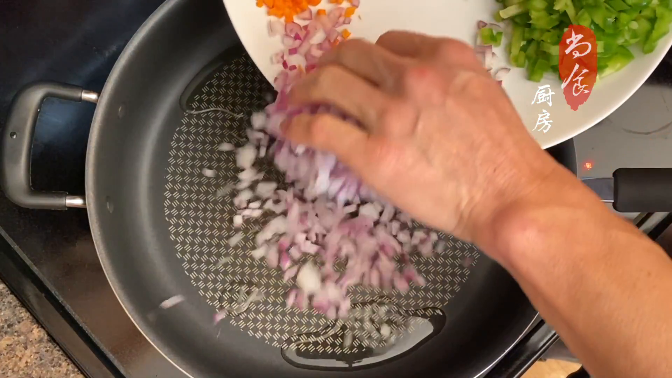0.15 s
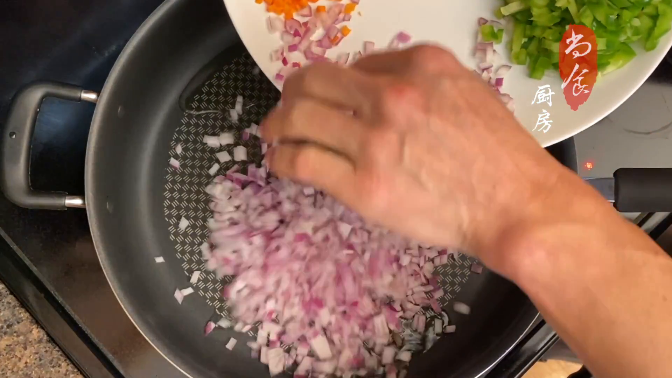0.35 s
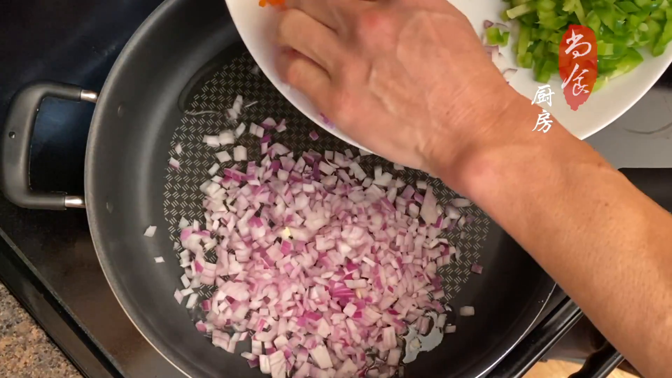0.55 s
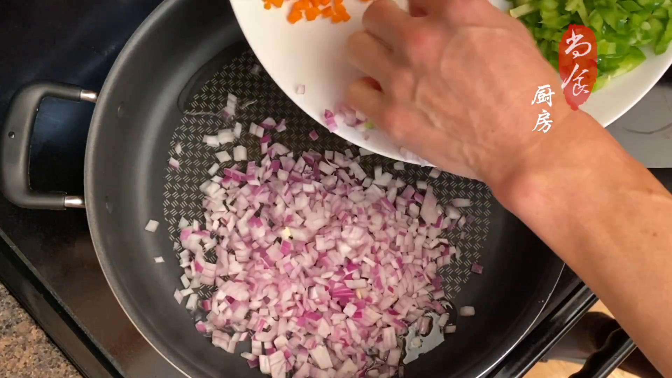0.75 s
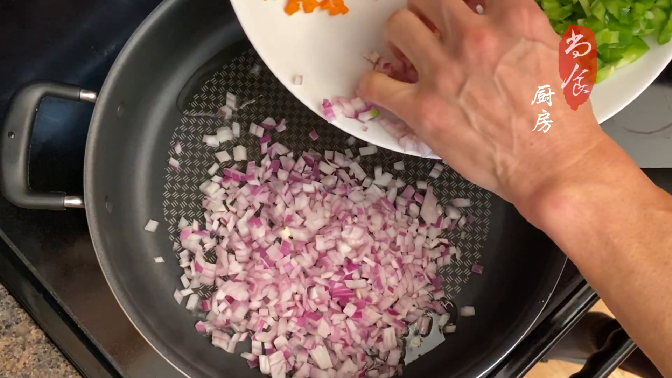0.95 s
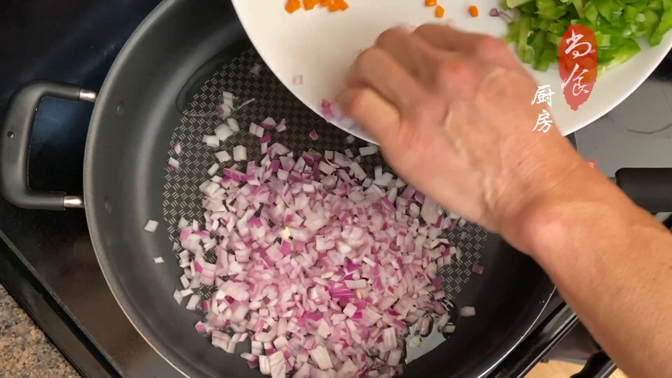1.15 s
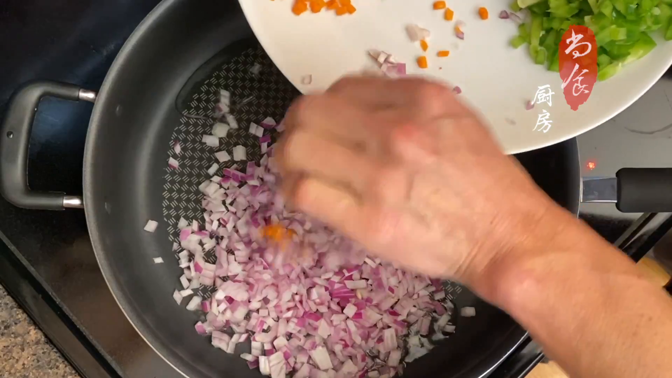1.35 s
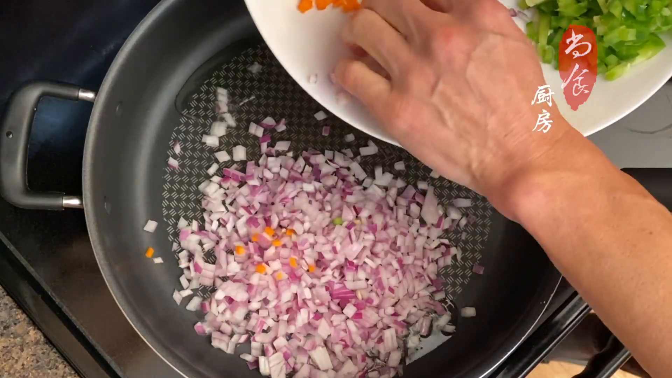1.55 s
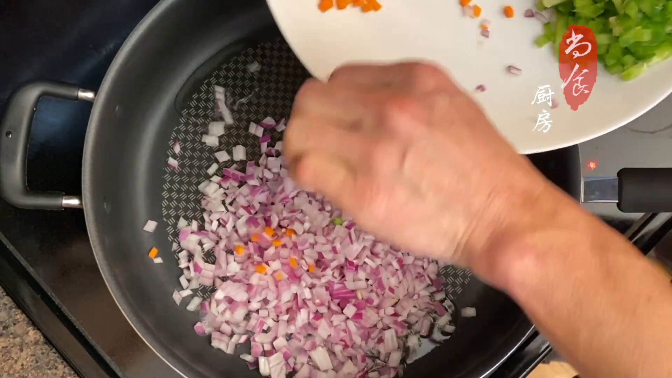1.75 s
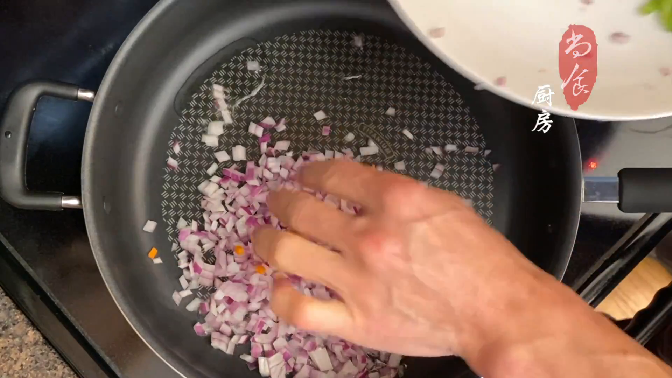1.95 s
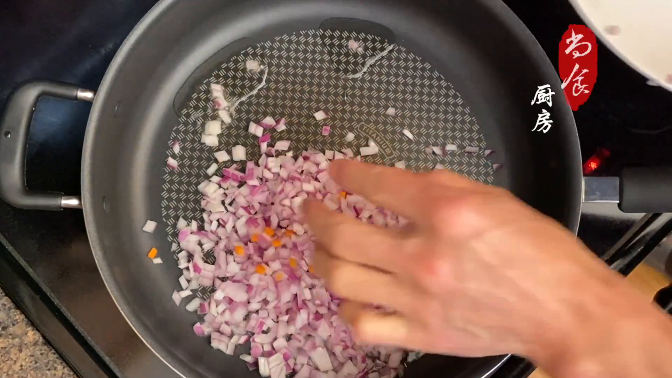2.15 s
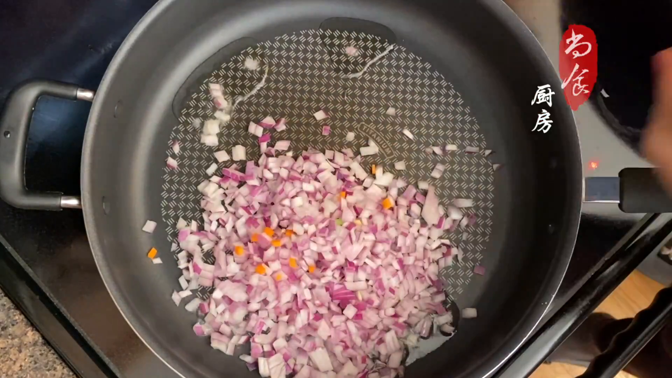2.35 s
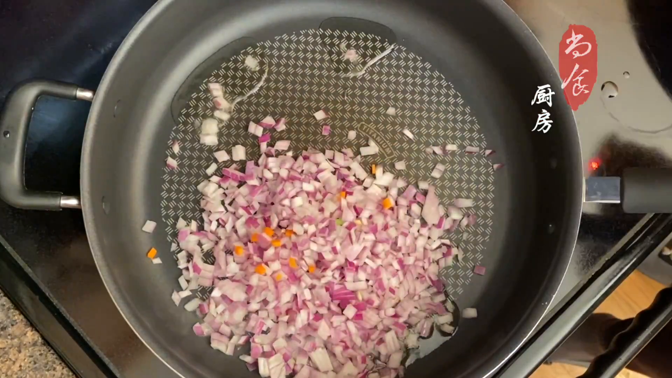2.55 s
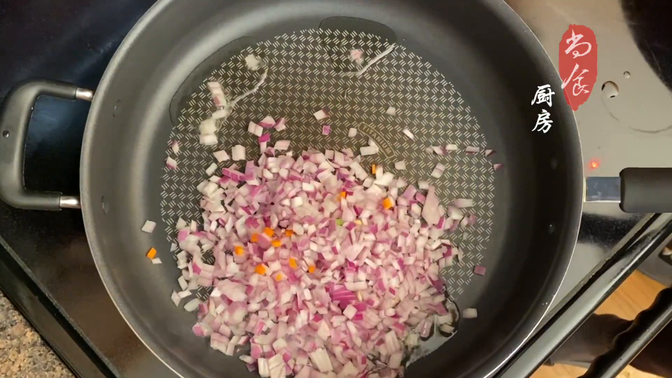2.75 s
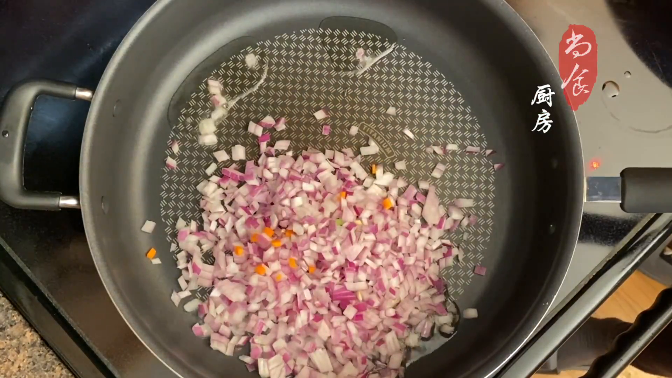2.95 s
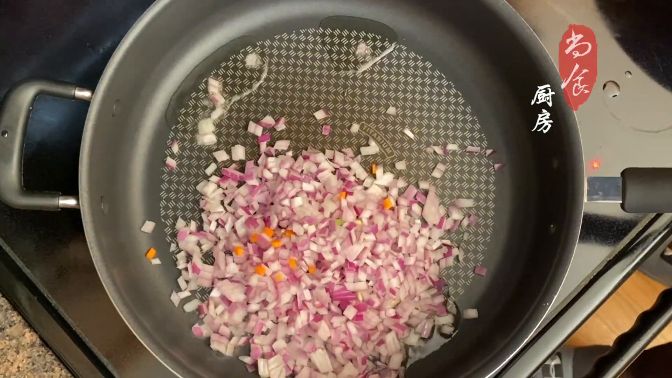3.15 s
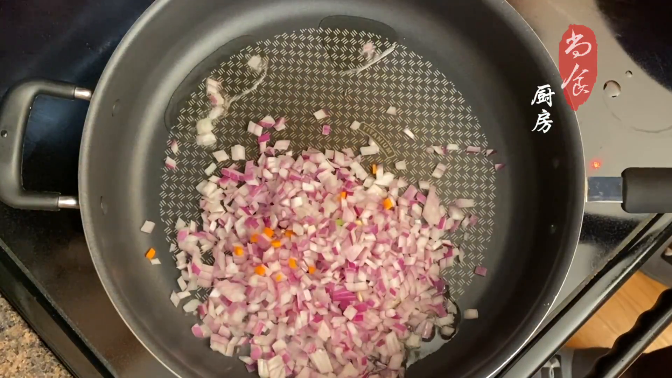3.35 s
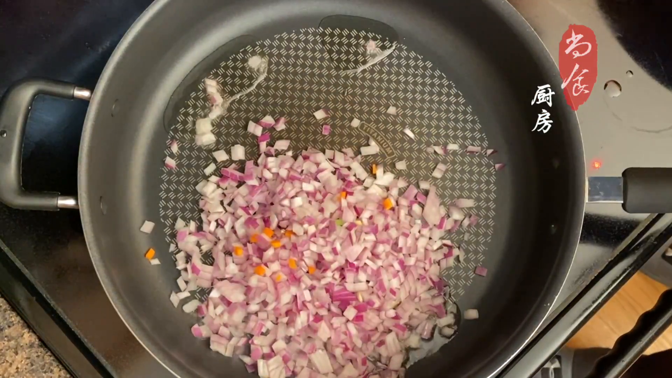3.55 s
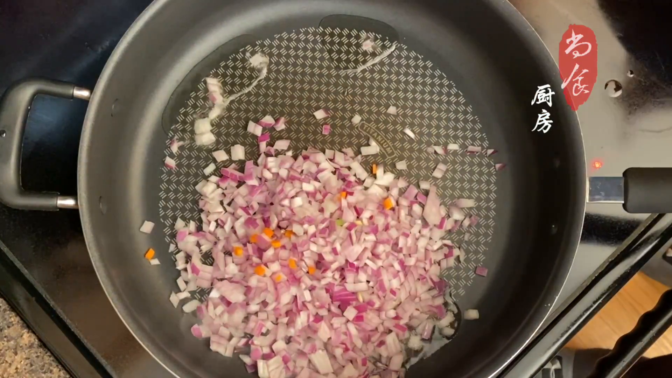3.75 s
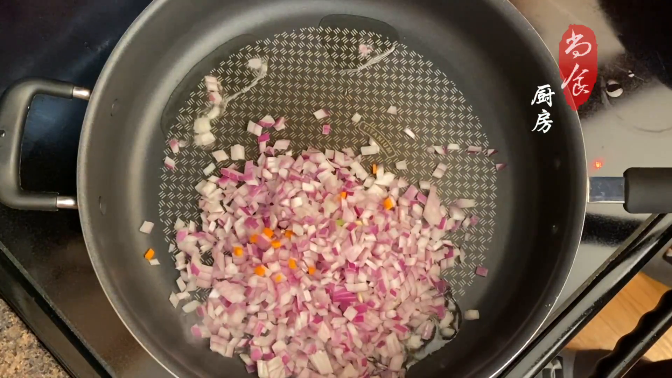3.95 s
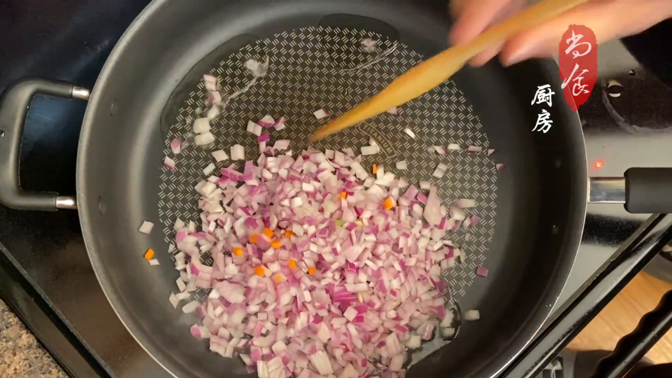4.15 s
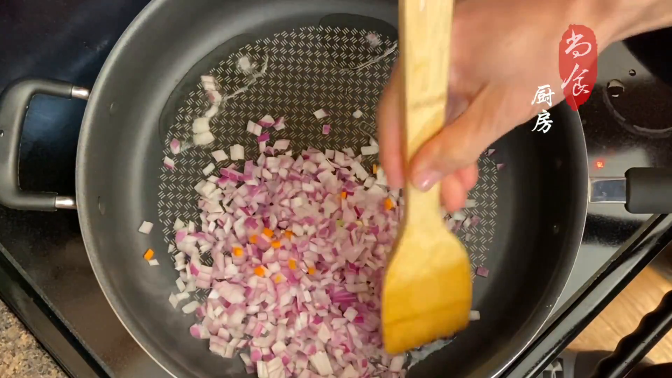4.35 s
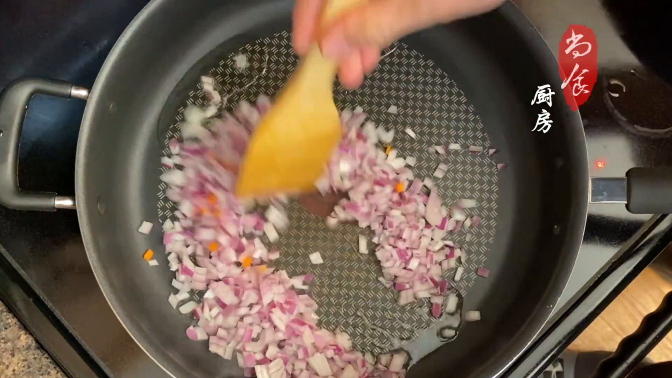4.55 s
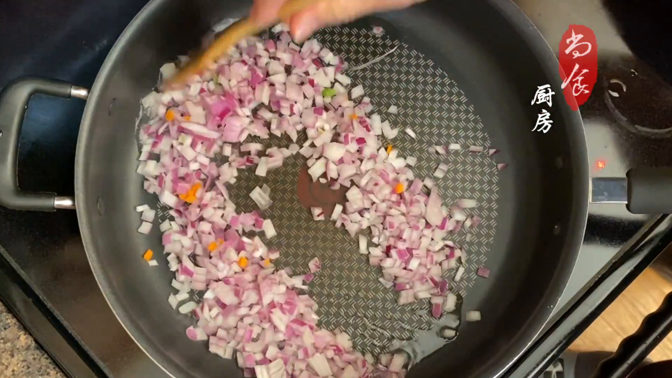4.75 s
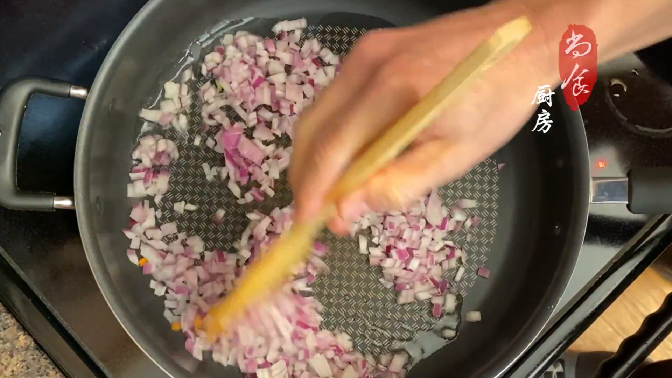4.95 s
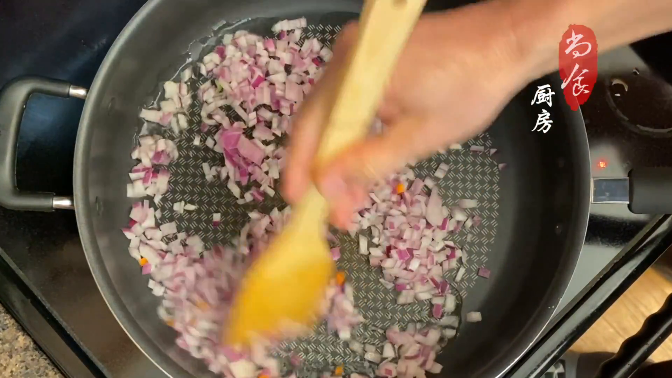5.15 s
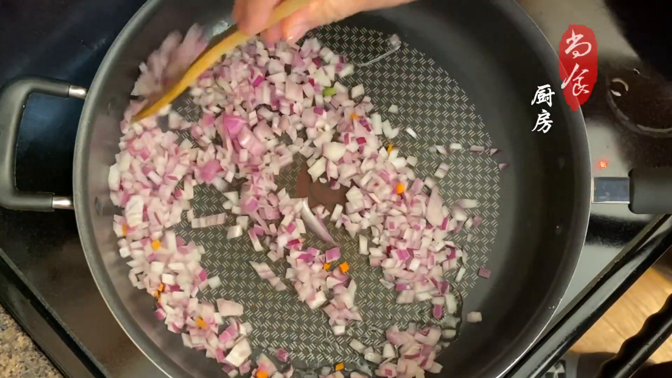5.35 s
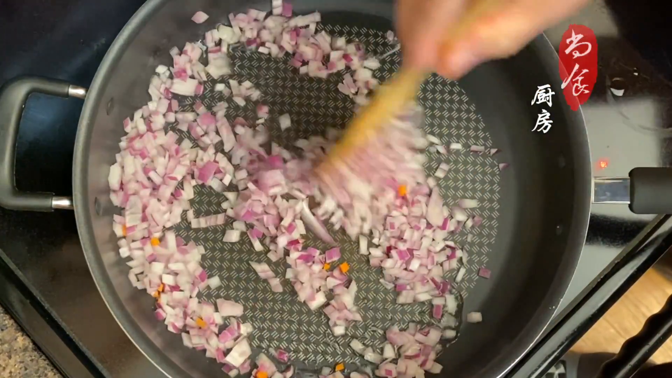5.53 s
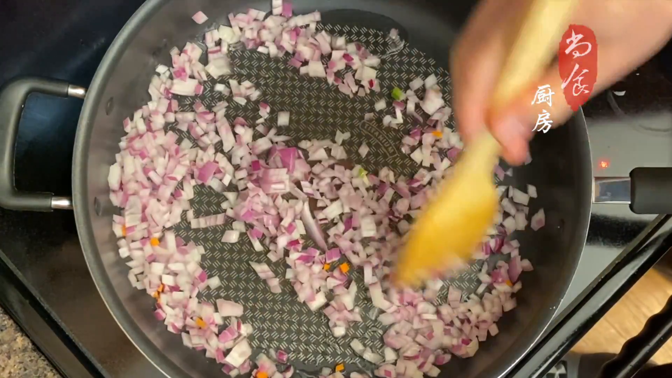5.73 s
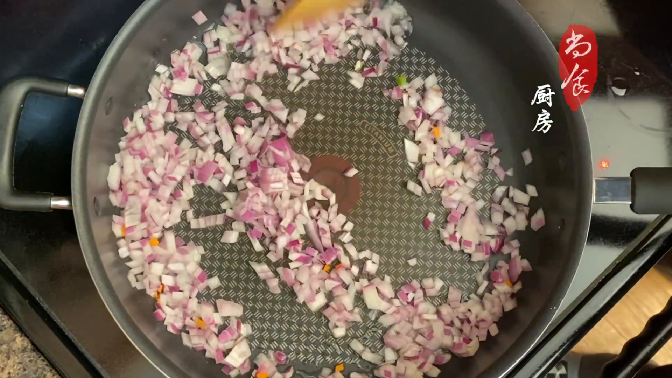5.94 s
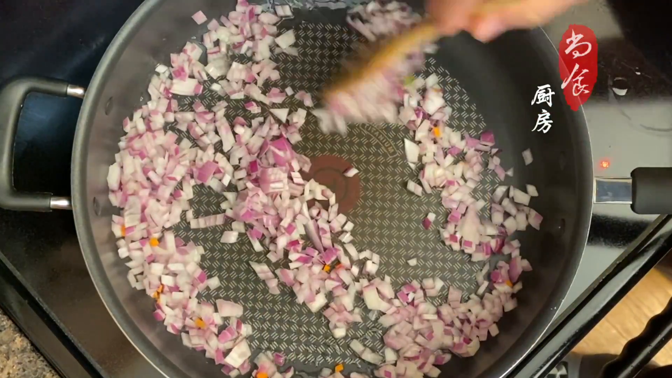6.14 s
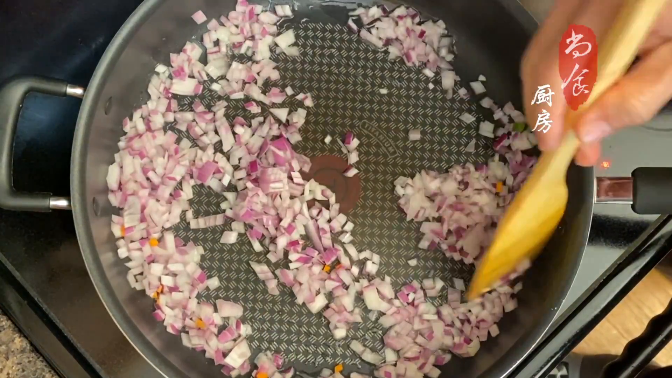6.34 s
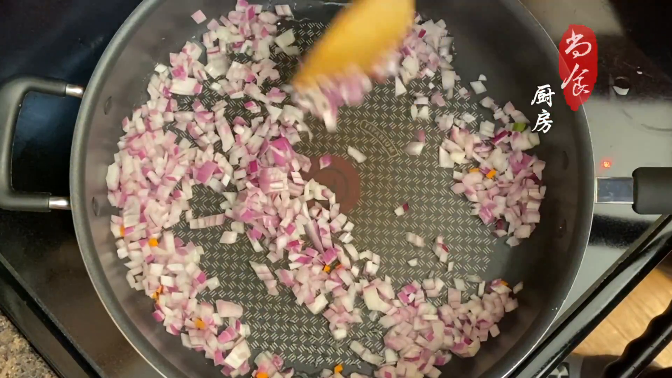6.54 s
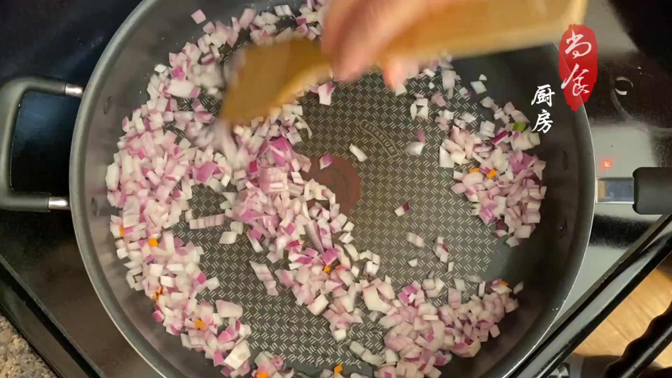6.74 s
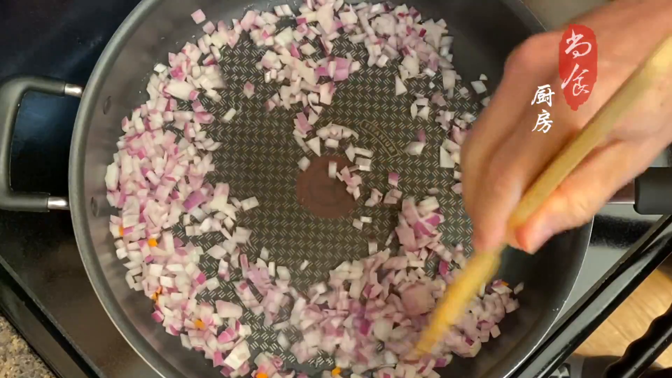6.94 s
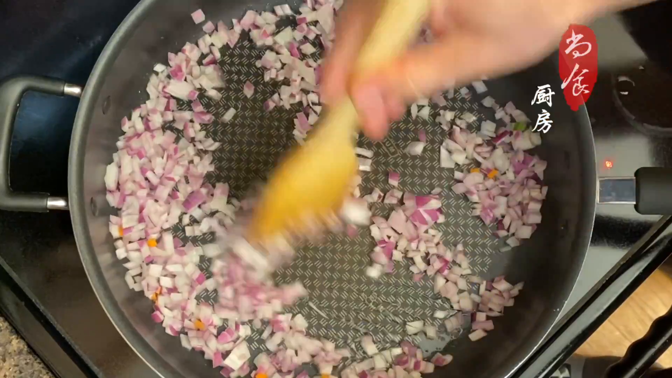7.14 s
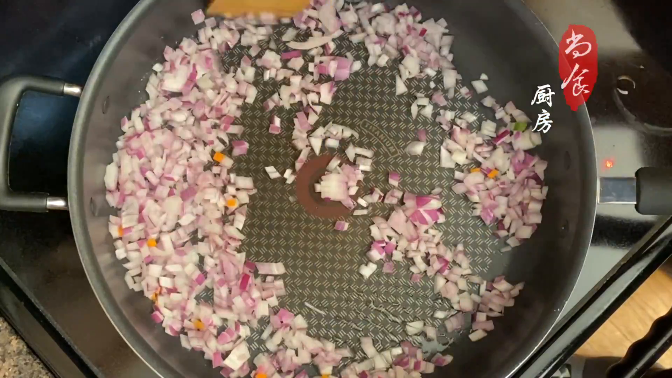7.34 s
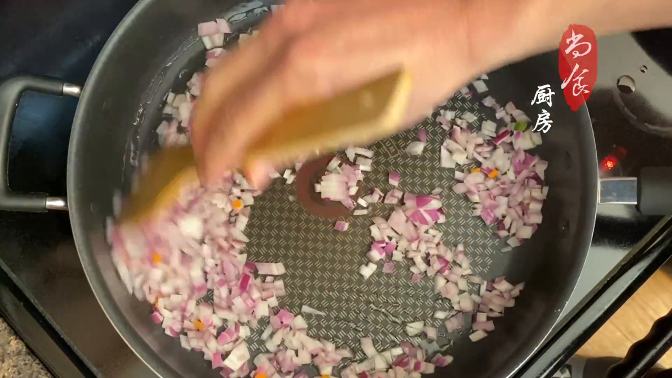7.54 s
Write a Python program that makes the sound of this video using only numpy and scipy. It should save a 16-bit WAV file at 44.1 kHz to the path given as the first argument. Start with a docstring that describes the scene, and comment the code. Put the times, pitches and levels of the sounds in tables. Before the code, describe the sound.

Diced onion patters softly onto a frying pan in the first half second, and a bright sizzle rises with it. The sizzle continues throughout, close and wide, with fine crackle and scattered sharp spits of oil. A plate knocks lightly on the pan's rim at about 1.2 seconds and harder at 1.7. At 2.6 seconds it clacks down on the counter, slightly to the right, and settles with a few smaller knocks around 3.1. From about 4.4 seconds a wooden spatula stirs: the frying swells and stays louder, with more frequent pops and one faint, brief squeak near 4.5. The blade bumps the pan with dull, irregular knocks, clearest around 4.8, 5.1, 5.4, 6.7 and 7.1 seconds. The sizzling is still going at the end, near 7.7 seconds. The knocks have a short kitchen reverberation, and a faint low air hum lies behind everything.

```python
"""Diced onion sizzles in hot oil: steam bubbles burst in surges and the oil spits. The dice are swept off a
plate and tap the bare pan; the plate knocks on the rim, then on the counter. A wooden spatula stirs: the frying
swells, the blade bumps the pan and squeaks once. Each knock shakes damped modes and the kitchen answers. Low
air noise hums behind. The stereo image varies with frequency; above about 14.6 kHz both channels carry the same
sound."""
import sys
import numpy as np
from scipy import signal
from scipy.fft import rfft, irfft, next_fast_len
from scipy.io import wavfile
from scipy.ndimage import uniform_filter1d, map_coordinates

SR = 44100
rng = np.random.default_rng(int(sys.argv[2]) if len(sys.argv) > 2 else 0)


def output_pcm(signal):
    """Save a mono or channel-first signal as 16-bit PCM at the path in sys.argv[1].

    Samples are clipped to [-1, 1] before scaling.
    """
    pcm = np.clip(np.atleast_2d(signal).T, -1, 1) * 32767
    wavfile.write(sys.argv[1], SR, np.round(pcm).astype(np.int16))


N = 339129

# How hard the onion fries, from still oil to stirring. Each row: time in seconds, relative level in dB.
FRY_LEVEL = [(0, -81), (.09, -85), (.115, -66), (.17, -60), (.28, -54.5), (.37, -49.5), (.47, -50),
             (.6, -49), (.8, -50.5), (1.2, -50), (1.6, -49.5), (2.05, -50), (3.5, -49.5), (3.9, -49.5),
             (4.43, -49.5), (4.52, -43.5), (4.64, -44), (5.05, -44.5), (5.48, -44), (5.85, -43.5),
             (6.3, -45.5), (6.58, -46.5), (6.85, -44.5), (7.05, -44), (7.25, -43), (7.42, -44.5),
             (7.69, -45.5)]
# Bubble spectra: mid sizzle, low fizz, high hiss. Each row: frequency in Hz, relative density in dB.
SIZZLE_SPECTRUM = [(500, -120), (900, -30), (2500, -10), (4500, 0), (7000, -1), (10000, -1.5), (11500, -5),
                   (13000, -0.5), (16500, -23)]
FIZZ_SPECTRUM = [(200, -120), (400, -6), (1000, -10), (1250, -5), (1500, -1.5), (1900, -3), (2600, -1.5),
                 (3500, -2.5), (6000, -14.5)]
HISS_SPECTRUM = [(8000, -60), (10000, -1), (11500, 0), (12800, 3), (14000, 2.5), (15000, 2.5), (15500, 3),
                 (17000, 3)]
# Pan resonances on the fizz and on the sizzle. Each row: frequency in Hz, width in Hz, gain in dB.
FIZZ_MODES = [(900, 82, 5.5), (1412, 40, -1), (1562, 20, 0), (1904, 19, 8), (2220, 190, -9), (3640, 13, 5)]
SIZZLE_MODES = [(4420, 410, -18.5), (5430, 150, -5), (6160, 280, -14), (6970, 240, -6.5), (8870, 980, -8),
                (10800, 110, -38)]
# Sharp spits of oil, with a few dull taps of landing dice and clacks.
# Each row: start in seconds, relative level in dB, sharpness in dB from dull to bright.
POPS = [(.0707, -62, -20), (.0964, -59, -21), (.1062, -48, -19.5), (.171, -47, -18), (.3844, -37, 7),
        (.445, -52, 9), (.7287, -35, 3), (1.5074, -41, 13.5), (1.6064, -35, 4), (1.9933, -38, 2),
        (2.0584, -29, 8.5), (2.1074, -43, 11), (2.2059, -35, -4), (2.2957, -32, 2), (2.3424, -40, 7),
        (2.431, -31, 2), (2.7728, -34, -11), (2.795, -36, -5), (2.923, -39, 6), (3.2427, -32.5, 0),
        (3.6243, -36, -10), (3.689, -34, -7), (3.7844, -29.5, -2), (3.897, -29.5, -3), (3.9005, -38, -2),
        (3.9815, -44, 0), (3.9935, -36, 5), (4.0126, -30, 0), (4.0806, -32, 7), (4.2145, -30, 0.5),
        (4.3914, -36, 7), (4.4805, -32, -10), (4.5032, -22, -10.5), (4.6735, -29.5, 9), (4.738, -28, -4),
        (4.8085, -33.5, 9.5), (4.8672, -34, -4), (4.9551, -30, -3), (5.0, -29.5, 5), (5.0595, -30, 3),
        (5.0705, -32, 3), (5.4335, -38, 8), (5.503, -25, 0), (5.5836, -29, 7.5), (5.6394, -36, 10.5),
        (5.651, -38, 12), (5.658, -30, -2), (5.679, -30.5, 7.5), (5.689, -35, 0), (5.9295, -30.5, 5),
        (5.9893, -36, 9), (6.074, -31, 0), (6.1325, -35, 9), (6.231, -43, 5), (6.353, -34, 7),
        (6.36, -36, -14.5), (6.5034, -36, 12), (6.5112, -27, -1), (6.6865, -35, -1), (6.966, -41, 13),
        (6.978, -39, 6), (7.047, -29.5, 6.5), (7.124, -36, 6), (7.3055, -32, 0), (7.365, -30, 0),
        (7.5137, -39, 12), (7.626, -39, 13), (7.676, -32, 2)]
# Dice landing. Each row: start in seconds, relative level in dB.
DICE_TAPS = [(0.069, -41.5), (0.107, -35), (0.133, -33), (0.195, -40), (0.201, -33), (.283, -42),
             (0.349, -43), (0.377, -46), (0.404, -40.5)]
# Patter of the falling heap. Each row: time in seconds, relative level in dB.
PATTER_LEVEL = [(.06, -80), (.104, -51), (.16, -46.5), (.22, -44.5), (.272, -54), (.3, -48.5), (.36, -54),
                (.42, -57), (.46, -70), (.5, -75)]
# Plate on the pan's rim and on the counter. Each row: start in seconds, relative level in dB,
# weight in dB, hardness in dB, place (+ left, - right), chatter t60 in seconds, bass lag in cycles.
RIM_BLOWS = [(1.2058, -27.5, 3, -26, 0.37, 0.032, .7), (1.392, -58, 0, -20, .5, .02, .7),
             (1.5443, -50, -8, -18, .6, 0.02, 0.71), (1.7337, -17, 0, -10, 0.18, 0.034, 0.677)]
COUNTER_BLOWS = [(2.6332, -18.5, -9.5, -3.5, -.58, 0.036, .7), (2.692, -44, 0, 0, -.3, 0.034, .5),
                 (2.862, -36, -7, -12, -0.43, 0.04, 0.427), (2.9, -51, -2, -14, -.3, 0.049, 0.3),
                 (3.0866, -29, 1, -0.5, -0.19, 0.049, 0.837), (3.0996, -39, -1, 1, -.3, 0.089, 0.838),
                 (3.1076, -42, 11, 12, -.3, 0.05, 0.91), (3.1416, -42, 1, 8, -.3, 0.094, 0.87)]
# Spatula on the pan. Each row: start in seconds, relative level in dB, weight in dB, hardness in dB,
# chatter t60 in seconds, bass lag in cycles.
SPATULA_BLOWS = [(4.079, -60, -10, 10, 0.047, .6), (4.443, -55, 16, -8, 0.06, 0.58),
                 (4.458, -50.5, -2, 17, 0.044, .6), (4.481, -64, 0, 23.5, 0.034, 0.49),
                 (4.503, -58, -10, 15, 0.029, 0.33), (4.804, -40.5, -5, -16, 0.035, 0.6),
                 (5.144, -40, -29, -15, 0.05, .55), (5.421, -36, -4, 4, 0.041, .8),
                 (5.64, -55.5, 14, -12, 0.0081, 1.1), (5.677, -46.5, 24, -12, 0.01, 1.4),
                 (6.036, -54.5, -13, 6, 0.024, .6), (6.146, -54.5, 7, -8, 0.037, 0.6),
                 (6.353, -60, -18, 17, 0.044, 0.43), (6.375, -57, -3, -6, 0.063, 0.48),
                 (6.687, -43.5, -3, 11.5, 0.048, .8), (6.821, -51, 15, 4, 0.018, .8),
                 (7.036, -57, 1, -4, .03, .5), (7.056, -42, -14, -22, 0.041, .5),
                 (7.352, -64, 16, -10, .03, 0.48), (7.388, -55.5, 4, -5, 0.062, .8)]
# Modes of the struck bodies. Each row: frequency in Hz, width in Hz, gain in dB.
BARE_PAN_MODES = [(533, 81, -5.5), (788, 43, 0.5), (1072, 59, 3.5), (1400, 280, -2), (2000, 130, -6),
                  (2540, 230, -9)]
PAN_RIM_MODES = [(93, 22, -6.5), (182, 48, 1), (307, 69, -3.5), (550, 87, 0.5), (840, 105, 0),
                 (1100, 84, -1.5), (1329, 52, 10), (1697, 92, 10), (2300, 530, 7), (3470, 560, 8),
                 (5200, 580, 13), (8900, 14000, 3)]
PLATE_ON_COUNTER_MODES = [(90, 19, -1), (177, 61, 3), (267, 51, 8), (373, 53, 6), (613, 100, 1.5),
                          (825, 49, 6.5), (1135, 83, 4), (1360, 91, 3.5), (1840, 200, 5), (2240, 170, 11.5),
                          (2920, 210, 8), (3490, 290, 11.5), (4560, 320, 16), (5300, 730, 14.5),
                          (9250, 9700, 10)]
LOADED_PAN_MODES = [(70.4, 100, 10), (136, 175, 10), (234, 146, 1.5), (295, 120, 1), (470, 140, 2.5),
                    (554, 110, 4), (810, 130, 0.5), (1230, 230, 1.5), (1900, 180, -2), (2660, 320, 4)]
# Blow spectra before tilt. Each row: frequency in Hz, gain in dB, share of weight, share of hardness.
PLATE_FORCE = [(25, -44, 0.95, 0), (70, -22.5, 0.99, 0.54), (151, -17, 0.87, 0.05), (294, -16, -0.17, 0),
               (745, -7, 0.34, 0.09), (1280, -4.5, -0.1, 0.063), (1720, -4, -0.14, 0.3),
               (2300, -13, -0.55, 0.54), (5500, -12.5, 0.29, 0.44)]
SPATULA_FORCE = [(25, -60, 1.0, 0.24), (90.5, -27.5, 0.75, 0.11), (267, 0.5, 0.16, 0.053),
                 (510, -3.5, 0, 0), (700, 1, 0.013, 0.24), (1200, -5.5, 0.17, 0.37),
                 (2600, -24, 0.48, 2.14)]
# Kitchen air. Each row: frequency in Hz, relative density in dB.
AIR_SPECTRUM = [(15, -23), (40, -17), (70, -3.5), (100, 1), (125, 4), (160, -4), (200, -4.5), (260, -2.5),
                (350, -7), (500, -16), (800, -12), (1200, -48), (2500, -50), (4000, -64)]
# Kitchen decay. Each row: frequency in Hz, t60 in seconds.
KITCHEN_T60 = [(100, 0.43), (1000, 0.25), (4000, 0.29), (12000, 0.021)]
# Stereo image. Each row: frequency in Hz, likeness from 0 to 1, lead of the right channel in radians,
# left minus right in dB.
STEREO_IMAGE = [(30, .88, 0, 1), (80, .96, 0, .3), (250, .93, 0, .5), (700, .45, -.2, .5),
                (1000, .35, -.3, 3), (1500, .55, -.4, 0), (2200, .42, -.5, 2.5), (3200, .5, -.5, .5),
                (5200, .4, -2, 3.5), (7200, .42, -1.3, 3.5), (7900, .1, 0, 4.5), (8500, .28, 1.6, 3),
                (9600, .17, 1, 1.5), (10600, .35, 2.1, .8), (11400, .93, 3.1, .3), (12300, .77, 3.7, 0),
                (13800, .7, 5, 0), (14600, 1, 2 * np.pi, 0)]


def frying():
    """Three sizes of steam bubble surge together as juice meets oil; each also crackles on its own."""
    rest_db, hiss_lag_s = -50.5, 0.067
    landed_s, drying_s = 0.35, 0.76
    fry_db = curve(FRY_LEVEL)
    harder_db = np.maximum(fry_db - rest_db, 0)
    calmer_db = np.minimum(fry_db - rest_db, 0)
    # Wet, fresh onion hisses brighter, then dries off.
    fresh_db = 7.5 * np.exp(-np.abs(np.arange(N) / SR - landed_s) / drying_s)
    step = 1 / (hiss_lag_s * SR)
    lagged_db = signal.lfilter([step], [1, step - 1], harder_db)
    fizz_db = -59 + harder_db + 0.49 * calmer_db
    hiss_db = -49 + 1.92 * lagged_db + calmer_db + fresh_db
    surge = amp(0.15 * wobble(rate_hz=5) + 0.5 * wobble(rate_hz=14))
    swells = bursts(per_s=65, spread_db=0.5, life_s=0.013)
    snaps = bursts(per_s=77, spread_db=1, life_s=0.0001)

    def bubbles(spectrum, swell, crackle, snap):
        own = bursts(per_s=820, spread_db=4.5, life_s=0.0066)
        return wide_noise(surge * (1 + swell * swells + crackle * own + snap * snaps), spectrum)

    sizzle = bubbles(SIZZLE_SPECTRUM, swell=.15, crackle=.4, snap=.12)
    fizz = bubbles(FIZZ_SPECTRUM, swell=.25, crackle=.4, snap=.12)
    hiss = bubbles(HISS_SPECTRUM, swell=.18, crackle=.5, snap=.17)
    fizz = flare_ups(filtered(fizz, lambda hz: 1 + 1.13 * np.abs(ringing(FIZZ_MODES, hz))))
    sizzle = flare_ups(filtered(sizzle, lambda hz: 1 + np.abs(ringing(SIZZLE_MODES, hz))))
    return amp(fry_db + 2.5) * sizzle + amp(fizz_db) * fizz + amp(hiss_db) * hiss


def bursts(per_s, spread_db, life_s):
    """Envelope of random bursts: sudden rise, short decay, scattered sizes."""
    starts = (rng.random(N) < per_s / SR) * amp(spread_db * np.clip(rng.standard_normal(N), -2, 2))
    return unit(signal.lfilter([1], [1, -np.exp(-1 / (life_s * SR))], starts))


def flare_ups(x, depth_db=1):
    """Parts of the pan flare up: random swells over patches of time and frequency."""
    spectra = signal.stft(x, nperseg=512)[2]
    field = uniform_filter1d(rng.standard_normal(spectra.shape[1:]), 7, axis=0)
    field = uniform_filter1d(field, 9, axis=1)
    return unit(signal.istft(spectra * amp(depth_db * unit(field)), nperseg=512)[1][:, :N])


def pops():
    """Oil spits, a few dull taps and clacks: each a snap, a crack and a puff, in three bands."""
    lesser_per_s, puff_t60_s, crack_t60_s = 14, 0.082, 0.0045
    bands_hz = [(1200, 2360), (2800, 7200), (7000, 14000)]
    starts_s = np.cumsum(rng.standard_exponential(200)) / lesser_per_s
    excess_db = 3.5 + 3 * np.minimum(rng.standard_exponential(200), 3)
    levels_db = np.interp(starts_s, *np.transpose(FRY_LEVEL)) + excess_db
    lesser = np.transpose([starts_s, levels_db, 4 * rng.standard_normal(200)])
    t = np.arange(SR // 20) / SR
    envelope = amp(-9 - 60 * t / puff_t60_s) + amp(-2 - 60 * t / crack_t60_s)
    bands = np.zeros((3, 2, N + SR))
    for start_s, level_db, sharp_db in [*POPS, *lesser[starts_s < N / SR]]:
        pop = envelope * rng.standard_normal((3, 2, len(t)))
        pop[..., 0] = amp(7.5) * np.array([1, rng.uniform(-.6, .2)])  # snap, randomly placed
        band_db = level_db + np.array([-9 - 1.34 * sharp_db, 0, -6 + 1.49 * sharp_db])
        bands[..., round(start_s * SR):][..., :len(t)] += amp(band_db)[:, None, None] * pop
    mixed = sum(butter(band, 1, edges_hz, "band") for edges_hz, band in zip(bands_hz, bands))
    return butter(mixed[:, :N], 2, 900, "high")


def dice():
    """Soft taps of onion ring the floor of the bare pan."""
    rise_s, t60_s = 0.0014, 0.022
    floor = lambda hz: ringing(BARE_PAN_MODES, hz)
    grains = bursts(per_s=990, spread_db=3, life_s=0.0048) * rng.standard_normal((2, N))
    patter_db = curve([(0.0046, -120), *PATTER_LEVEL, (.6, -120)]) - 5
    patter = amp(patter_db) * unit(filtered(grains, floor))
    taps, t = np.zeros((2, N)), np.arange(SR // 20) / SR
    for start_s, level_db in DICE_TAPS:
        envelope = amp(level_db + 13 - 60 * t / t60_s) * (1 - np.exp(-t / rise_s))
        taps[:, round(start_s * SR):][:, :len(t)] += envelope * rng.standard_normal((2, len(t)))
    return patter + filtered(taps, floor)


def plate():
    """The plate knocks on the pan's rim, then on the counter."""
    rim = knocks(RIM_BLOWS, PAN_RIM_MODES, PLATE_FORCE,
                 gain_db=36.5, chatter_db=-26.5, tilt_db_per_decade=20.5, room_db=-16)
    counter = knocks(COUNTER_BLOWS, PLATE_ON_COUNTER_MODES, PLATE_FORCE,
                     gain_db=35, chatter_db=-26.5, tilt_db_per_decade=17.5, room_db=-12.5)
    return rim + counter


def spatula(place=0.21):
    """Wood bumps the loaded pan, left of centre."""
    blows = [(*row[:4], place, *row[4:]) for row in SPATULA_BLOWS]
    return knocks(blows, LOADED_PAN_MODES, SPATULA_FORCE,
                  gain_db=37.5, chatter_db=-28, tilt_db_per_decade=17, room_db=-19)


def knocks(blows, modes, spectrum, gain_db, chatter_db, tilt_db_per_decade, room_db):
    """A jolt and a short chatter shake damped modes; heavy blows are deeper, hard ones brighter."""
    out, size, lead = np.zeros((2, N + SR)), SR // 4, SR // 50
    t, hz = np.arange(size) / SR, np.fft.rfftfreq(2 * size, 1 / SR)
    base_db, weight_share, hard_share = along(spectrum, hz)
    base_db = base_db - tilt_db_per_decade * np.log10(hz / 1000 + 0.0077)
    widen = 2.0  # the walls hear each mode from many sides
    wide_modes = np.abs(ringing(np.array(modes) * [1, widen, 1], hz)) / np.sqrt(widen)
    for start_s, level_db, weight_db, hard_db, place, chatter_s, lag_cycles in blows:
        force = amp(chatter_db - 60 * (t / chatter_s) ** 2) * rng.standard_normal((2, size))
        force[:, 0] = 1, place
        gain = amp(level_db + gain_db + base_db + weight_db * weight_share + hard_db * hard_share)
        # Bending waves: low tones travel slower.
        dispersion = np.exp(-2j * np.pi * lag_cycles * (np.log(hz + 30) - hz / 3000))
        drive = rfft(np.roll(force, lead, axis=1), 2 * size) * gain * dispersion
        direct = irfft(drive * ringing(modes, hz))[:, :size]
        to_walls = irfft(drive[:1] * wide_modes)[:, :size]
        reverb = signal.fftconvolve(to_walls, kitchen_tail(size), axes=1)[:, :size]
        out[:, round(start_s * SR) - lead:][:, :size] += direct + amp(room_db) * reverb
    return out[:, :N]


def squeak(start_s=4.538, length_s=0.05, pitch_hz=1180):
    """The blade drags briefly: a narrow band of noise."""
    progress = np.clip((np.arange(N) / SR - start_s) / length_s, 0, 1)
    tone = filtered(rng.standard_normal((2, N)), lambda hz: ringing([(pitch_hz, 80, 0)], hz) ** 2)
    return amp(-57) * unit(tone) * np.sin(np.pi * progress)


def kitchen_tail(size):
    """Random room response; each frequency decays at its own rate."""
    hz, t, spectra = signal.stft(rng.standard_normal((2, size)), SR, nperseg=256)
    decay = amp(-60 * t / along(KITCHEN_T60, hz)[:, None])
    tail = signal.istft(spectra * decay, SR, nperseg=256)[1][:, :size]
    return np.pad(tail, ((0, 0), (300, 0))) / np.linalg.norm(tail[0])


def kitchen_hum():
    """Low air noise, slightly unsteady."""
    return amp(-66) * wide_noise(amp(0.94 * wobble(rate_hz=15)), AIR_SPECTRUM)


def stereo(pair):
    """A shared and an unshared signal mix into left and right, by frequency."""
    def response(hz, side):
        likeness, lead_rad, balance_db = along(STEREO_IMAGE, hz)
        angle = np.arccos(np.clip(likeness, 0, 1)) / 2
        gain = amp(side * balance_db / 2) * np.exp(-.5j * side * lead_rad)
        return gain * [np.cos(angle), side * np.sin(angle)]
    return np.array([filtered(pair, lambda hz: response(hz, side)).sum(axis=0) for side in (1, -1)])


def wide_noise(envelope, spectrum):
    """A wide source: two unrelated noises under one envelope, rms 1."""
    return unit(filtered(envelope * rng.standard_normal((2, N)), lambda hz: amp(along(spectrum, hz))))


def ringing(modes, hz):
    """Causal response of resonances with alternating signs."""
    return sum((-1) ** k * amp(db) * 1j * hz * width_hz / (mode_hz ** 2 - hz ** 2 + 1j * hz * width_hz)
               for k, (mode_hz, width_hz, db) in enumerate(modes))


def wobble(rate_hz):
    """Smooth random curve."""
    knots = rng.standard_normal(int(N * rate_hz / SR) + 4)
    return map_coordinates(knots, [np.arange(N) * rate_hz / SR])


def curve(rows):
    """Time table read at each sample."""
    return np.interp(np.arange(N) / SR, *np.transpose(rows))


def along(rows, hz):
    """Frequency table read on a log axis."""
    knots_hz, *columns = np.transpose(rows)
    return np.squeeze([np.interp(np.log(hz + 1), np.log(knots_hz + 1), c) for c in columns])


def filtered(x, response):
    """x through a complex frequency response."""
    size = next_fast_len(N + SR // 2)
    return irfft(rfft(x, size) * response(np.fft.rfftfreq(size, 1 / SR)), size)[..., :N]


def butter(x, order, edges_hz, kind):
    """x through a causal filter."""
    return signal.sosfilt(signal.butter(order, edges_hz, kind, fs=SR, output="sos"), x)


def amp(db):
    """dB to gain."""
    return 10 ** (np.asarray(db) / 20)


def unit(x):
    """x at rms 1."""
    return x / np.sqrt(np.mean(x ** 2) + 1e-20)


def scene():
    """All sources in stereo."""
    handling = plate() + spatula()
    return stereo(handling + pops() + frying() + dice() + kitchen_hum() + squeak())


def record(dry, low_hz=30, top_hz=15950):
    """The microphone cuts deep bass and everything above its band limit."""
    return filtered(butter(dry, 2, low_hz, "high"), lambda hz: hz < top_hz)


dry = scene()
out = record(dry)
output_pcm(out)
```